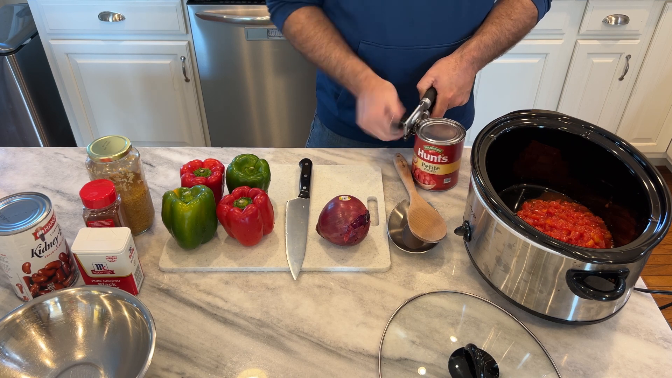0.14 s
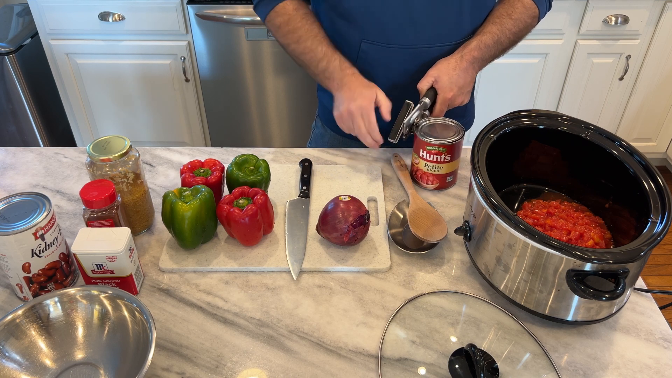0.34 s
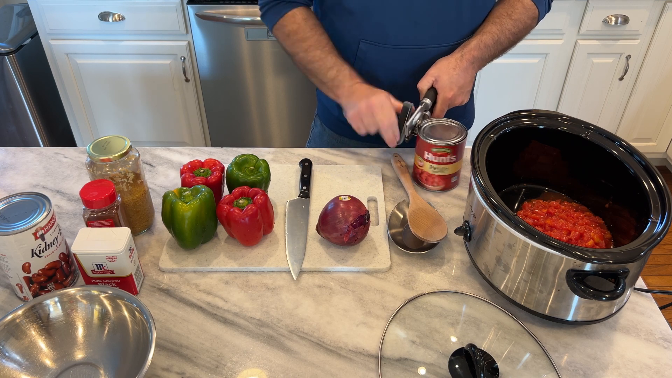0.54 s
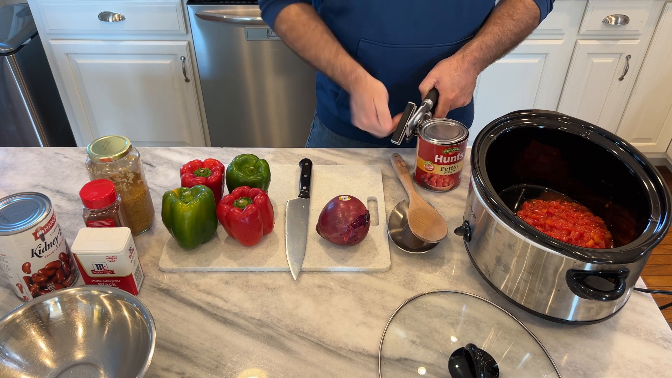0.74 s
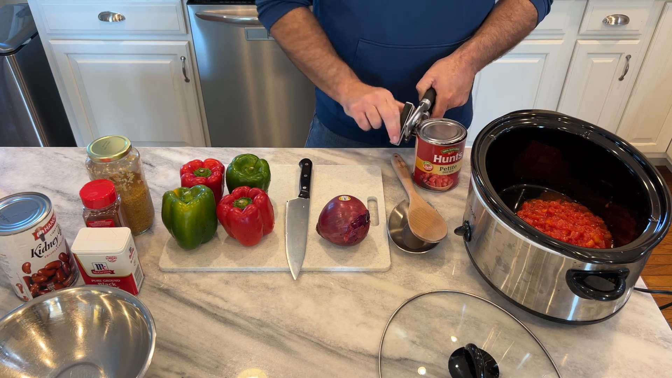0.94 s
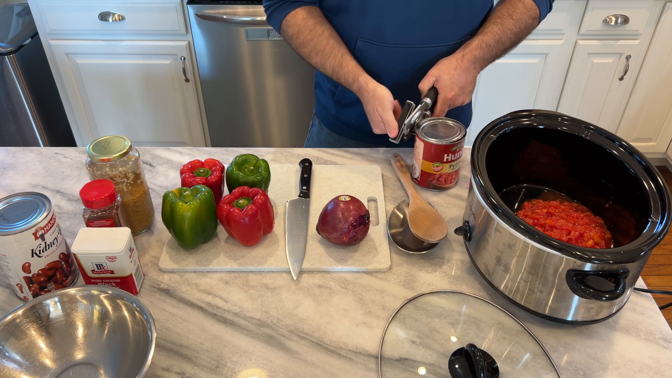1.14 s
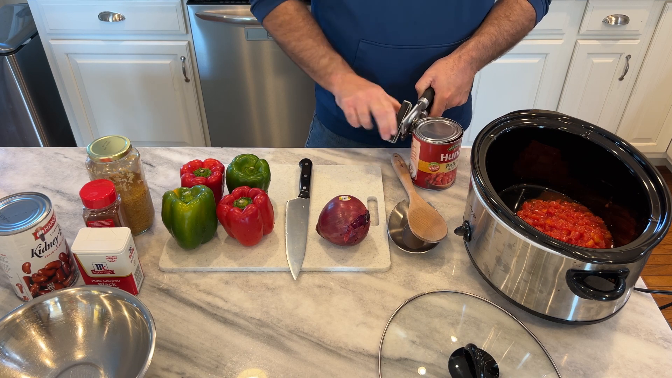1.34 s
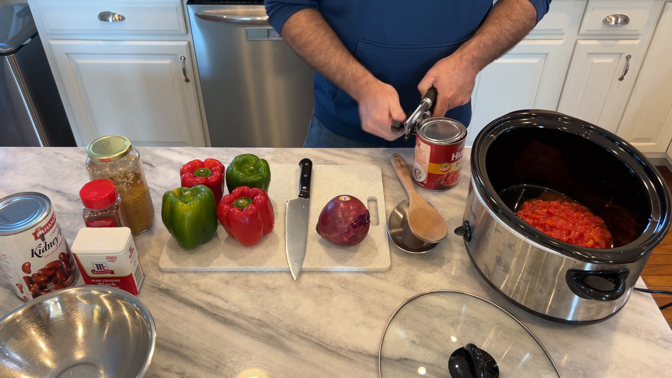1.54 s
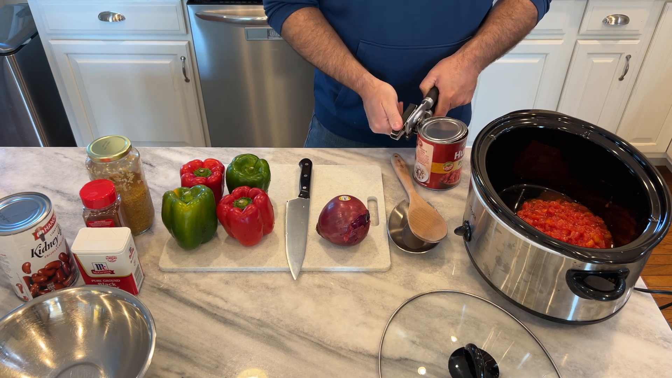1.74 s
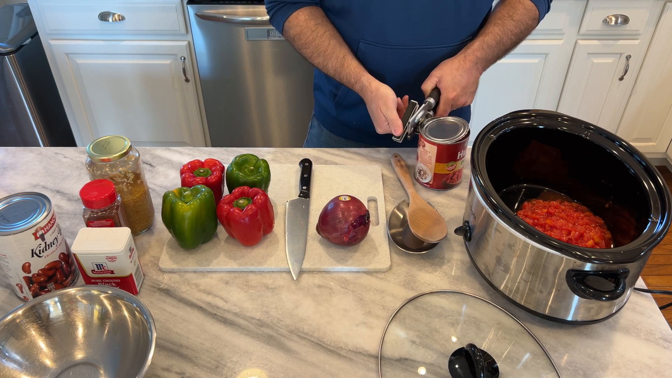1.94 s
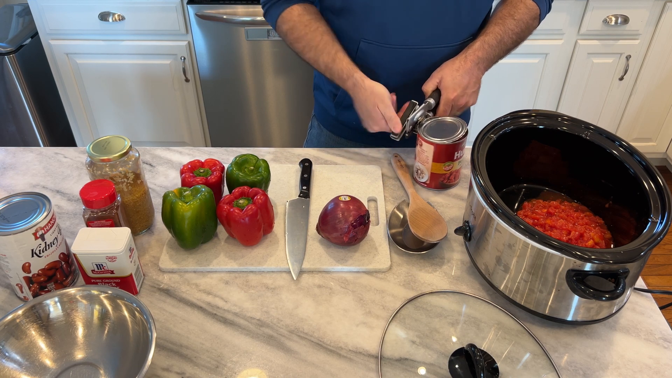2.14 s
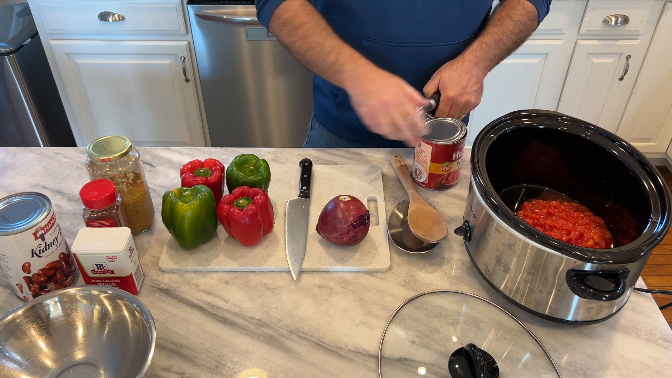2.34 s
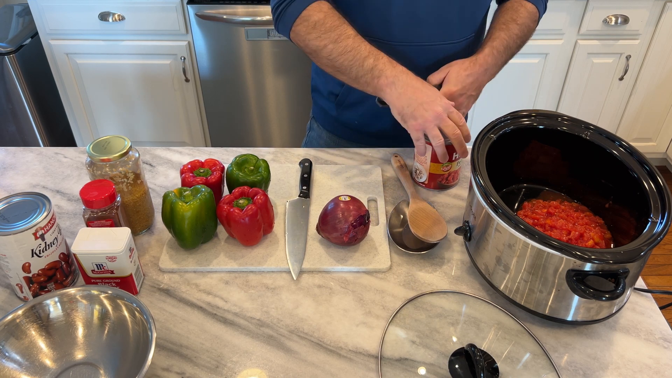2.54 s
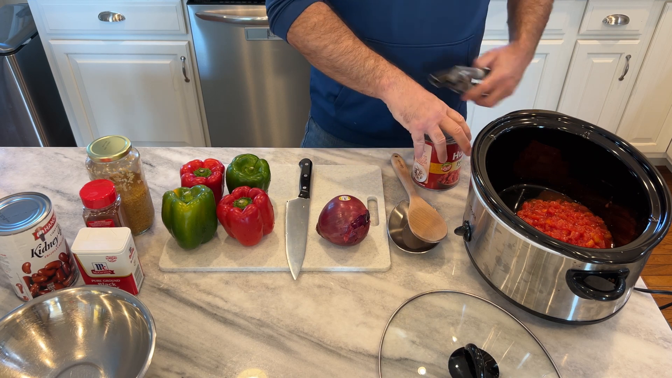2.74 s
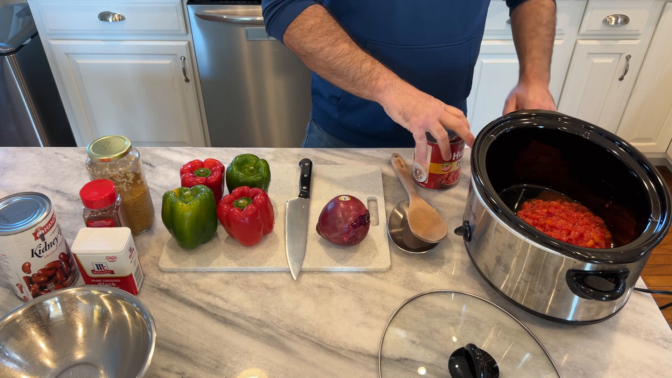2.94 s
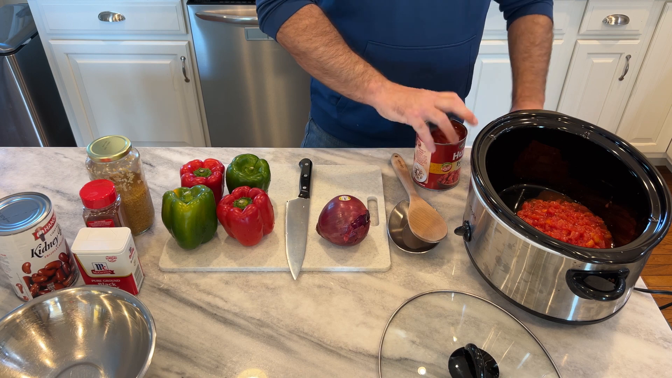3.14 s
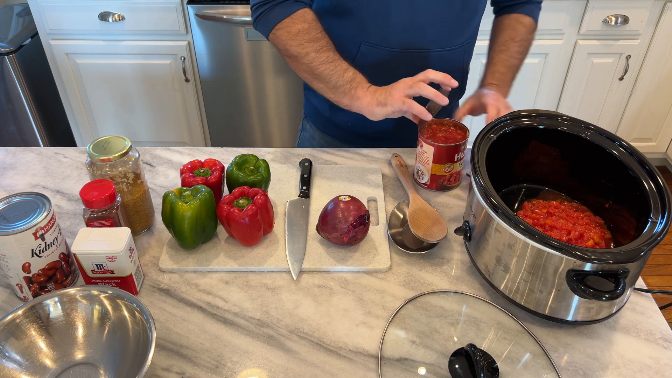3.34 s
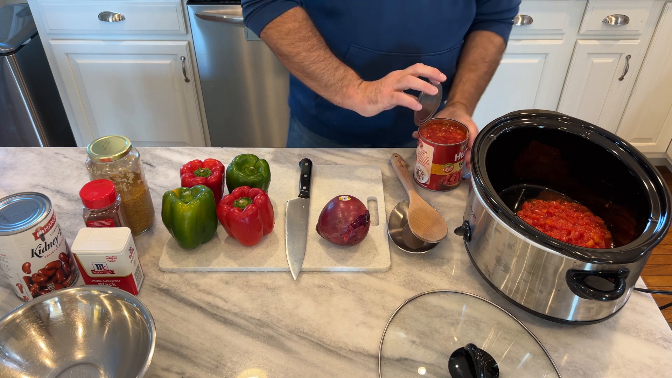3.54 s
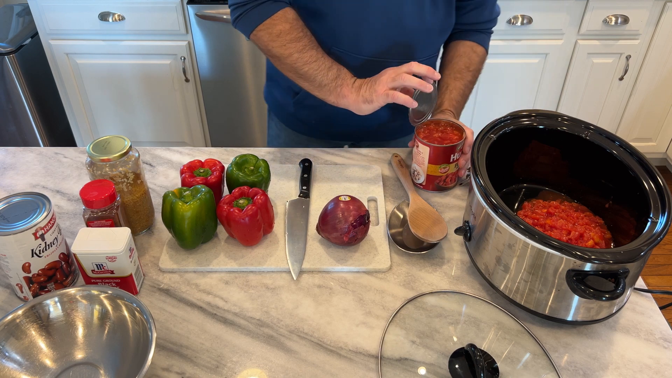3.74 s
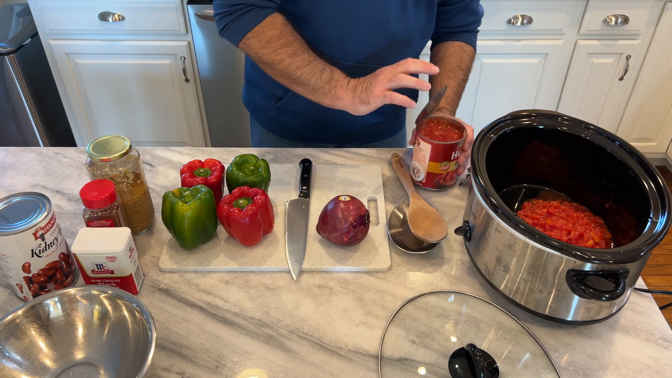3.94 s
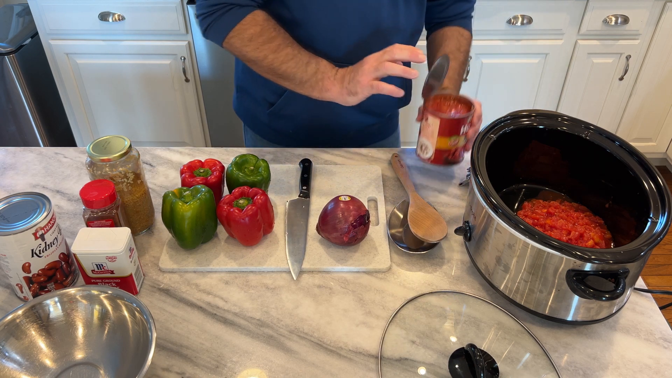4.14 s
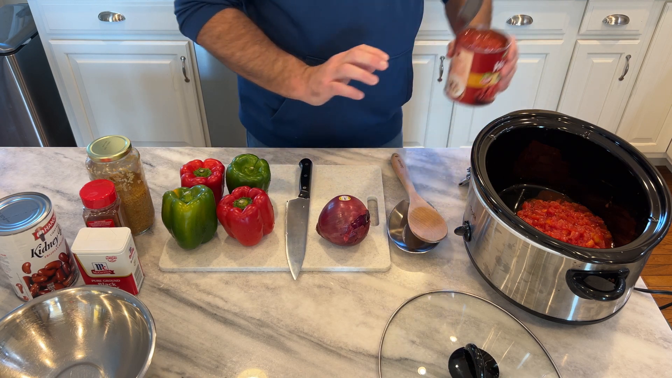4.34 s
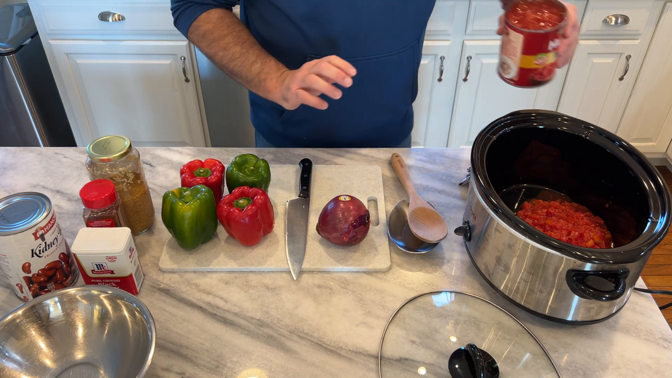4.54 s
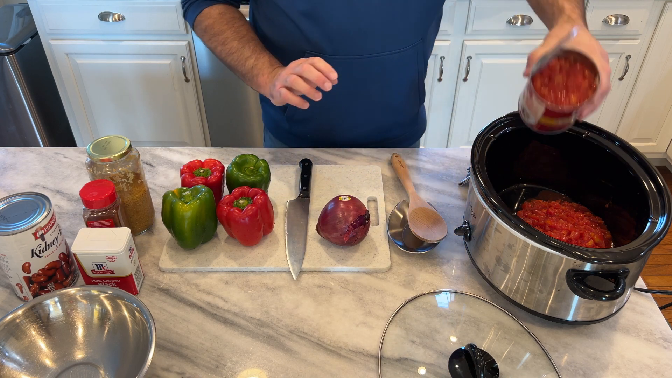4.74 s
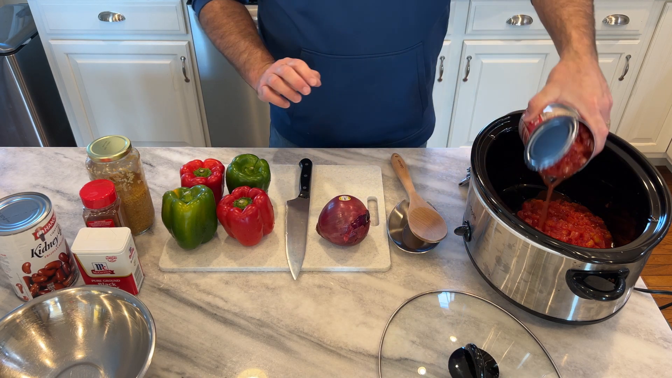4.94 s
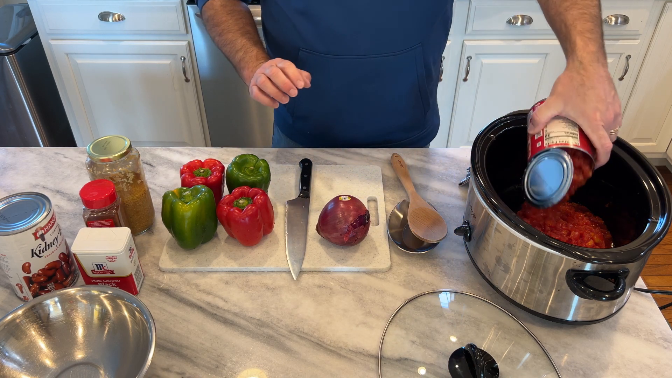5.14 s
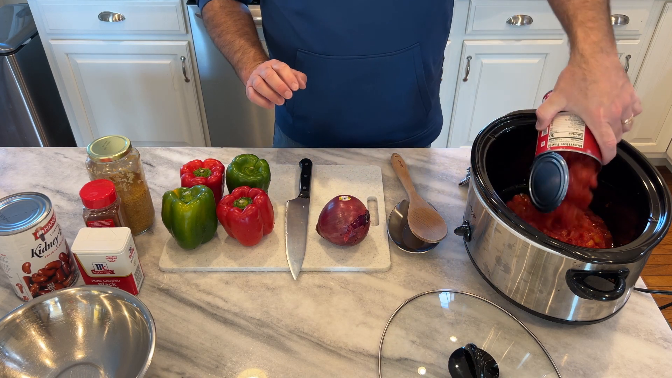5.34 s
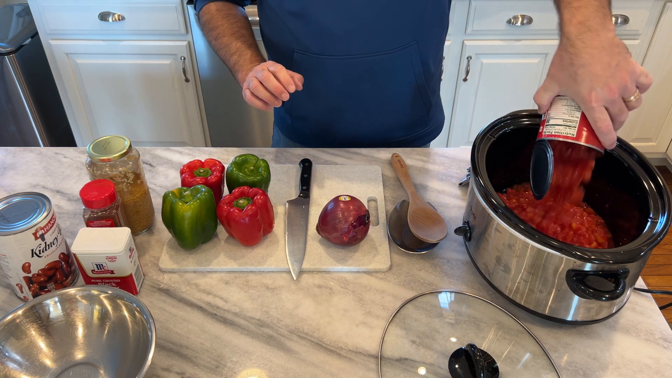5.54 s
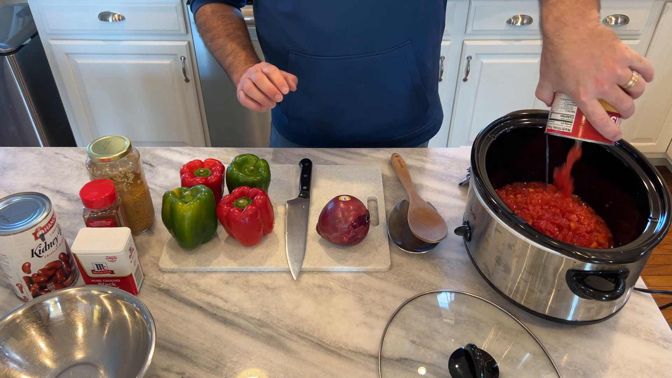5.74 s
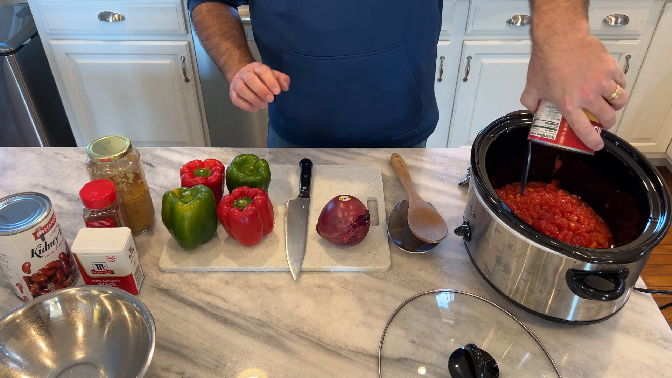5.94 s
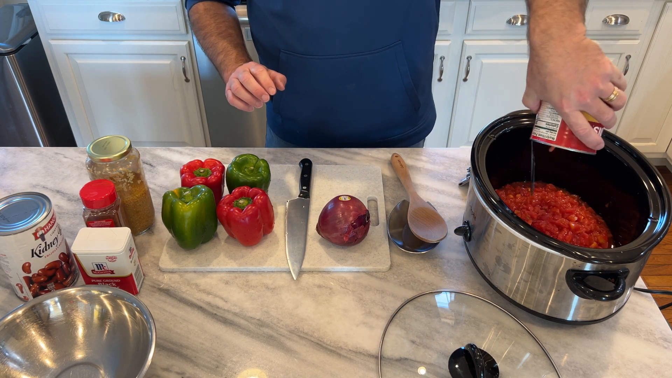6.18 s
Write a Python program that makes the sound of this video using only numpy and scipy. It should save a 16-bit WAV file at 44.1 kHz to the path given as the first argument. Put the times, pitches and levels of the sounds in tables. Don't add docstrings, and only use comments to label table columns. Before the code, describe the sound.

Stereo close recording of kitchen work: four grinding bursts of a can opener, roughly two per second and weakening, with hollow can resonance. A snap releases it, then the metal tool chinks and bangs onto a stone counter, the loudest moment. A hard knock rings the counter, low house rumble fills a pause, and chunky wet fruit slops softly into a slow cooker.

```python
import sys
import numpy as np
from scipy import signal
from scipy.fft import rfft, irfft, next_fast_len
from scipy.io import wavfile
from scipy.ndimage import uniform_filter1d

SR = 44100
rng = np.random.default_rng(int(sys.argv[2]) if len(sys.argv) > 2 else 0)


def wrap_up_sound(samples):
    columns = np.atleast_2d(samples).T
    tamed = np.clip(columns, -1, 1)
    steps = np.round(tamed * 32767).astype(np.int16)
    wavfile.write(sys.argv[1], SR, steps)


def volts_from_db(level):
    exponent = np.asarray(level, float) / 20
    return 10 ** exponent


N = 273861


def evened(x):
    return x / np.sqrt(np.mean(x ** 2) + 1e-20)


def read(points, hz):
    f, value = np.transpose(points)
    return np.interp(np.log(hz + 1), np.log(f + 1), value)


def curve(rows):
    s, *columns = np.transpose(rows)
    t = np.arange(N) / SR
    gate = np.clip(np.minimum(t - s[0], s[-1] - t) / 0.00158, 0, 1)
    return gate, *(np.interp(t, s, c) for c in columns)


def bumps(rows):
    t = np.arange(0, N + 64, 64) / SR
    total = sum(volts_from_db(db) * np.exp(np.minimum((t - s) / rise, (s - t) / fall)) for s, rise, fall, db in rows)
    return np.interp(np.arange(N) / SR, t, total)


def add(mix, s, sound):
    part = mix[round(s * SR):][:len(sound)]
    part += sound[:len(part)]


def coloured(x, points):
    if x.ndim > 1:
        return np.array([coloured(c, points) for c in x])
    gain_db = np.maximum(read(points, abs(np.fft.fftfreq(4096, 1 / SR))), -100)
    spectrum = np.exp(np.conj(signal.hilbert(np.log(volts_from_db(gain_db)))))
    taps = np.fft.ifft(spectrum).real[:2048]
    return signal.oaconvolve(x, taps, axes=-1)[..., :x.shape[-1]]


def resonate(x, modes):
    out = np.zeros(x.shape)
    for hz, width, db in modes:
        r = np.exp(-np.pi * width / SR)
        out += volts_from_db(db) * 2 * signal.lfilter([1 - r], [1, -r * np.exp(2j * np.pi * hz / SR)], x).real
    return out


def clicks(per_s, spread_db):
    size = volts_from_db(spread_db * np.minimum(rng.exponential(1, N), 5)) * rng.choice([-1., 1.], N)
    return evened(size * (rng.random(N) < per_s / SR))


def hits(rows, modes, ring_db, broad_db, bass_db, far_db=-2.5):
    t, out = np.arange(9000) / SR, np.zeros((2, N))
    for s, db, treble_db, top_db, ms in rows:
        rough, fine = rng.standard_normal((2, len(t)))
        colour = [(20, bass_db - 42.5), (90, bass_db - 4.5), (250, bass_db + 9.5), (1200, -1.5), (2300, -8),
                  (5500, treble_db - 3), (16000, treble_db - 15.5)]
        contact = np.exp(-1000 * t / max(ms, .3)) * (1 - np.exp(-t / 0.00036))
        crack = coloured(rough * contact, colour)
        crack /= abs(crack).max()
        push = coloured(1. * (t == 0), colour)
        ring = resonate(push, modes) * (1 - np.exp(-t / 0.0013))
        ring = volts_from_db(ring_db) * ring / abs(ring).max()
        tick = resonate(fine * np.exp(-t / 0.0019), [(13000, 2000, 0)])
        tick = volts_from_db(top_db + 8.0) * tick / abs(tick).max()
        add(out[0], s, volts_from_db(db) * (ring + tick + volts_from_db(broad_db) * crack))
        even = volts_from_db(broad_db) * evened(push) * crack.std()
        add(out[1], s, volts_from_db(db) * (volts_from_db(far_db) * ring + 0.41 * tick + even))
    return out


def ticks(rows, t60, rise):
    t, out = np.arange(6000) / SR, np.zeros(N)
    steepness = 3
    for s, db, hz, sharp_db in rows:
        fine, rough = rng.standard_normal((2, len(t)))
        sharp = np.diff(fine * np.exp(-t / 0.0018), n=steepness, prepend=np.zeros(steepness))
        tick = resonate(sharp, [(11900, 11000, 0)])
        fall = volts_from_db(-60 * t / max(t60, .003)) * (1 - np.exp(-t / 0.00038))
        fuzz = resonate(rough * fall ** 0.84, [(hz, 0.12 * hz, 0)])
        fuzz = resonate(fuzz, [(hz, 1.6 * hz, 0)])
        ring = np.sin(2 * np.pi * hz * t * (1 + rise * np.minimum(t / t60, 1))) * fall
        tick = volts_from_db(sharp_db + 12.5) * tick / abs(tick).max()
        add(out, s, volts_from_db(db) * (0.32 * ring + 0.95 * fuzz / abs(fuzz).max() + tick))
    return out


def crank():
    # start_s, push_s, hold_s, effort_db, brightness_db
    turns = [
        (-.1, 0.01, 0.085, -50, -4.5),
        (0.076, 0.02, 0.054, -30, -13.5),
        (0.529, 0.021, 0.06, -33, -12.5),
        (0.988, 0.031, 0.0038, -26.5, -8),
        (1.434, 0.031, 0.044, -39, -7),
    ]
    # pitch_hz, level_db per Hz
    scrape_colour = [(59, -38), (100, -8.5), (216, 7), (384, 5), (1030, 7), (2860, -13.5), (5500, -27),
                     (10500, -68.5), (15500, -22), (16500, -31)]
    # pitch_hz, width_hz, level_db
    lid_1 = [(218, 19, -4.5), (427, 50, -5), (642, 11.5, 11), (977, 31, 6), (1470, 28, -2), (1662, 36, -10),
             (2340, 81, -8), (3400, 35, -11), (3750, 46, -20)]
    lid_2 = [(221, 15.6, 2.5), (432, 29, -3), (645.5, 10.5, 3.5), (1016, 68, -4), (1433, 13, 2.5),
             (2360, 66, -9.5), (1770, 41, -17)]
    lid_3 = [(356, 120, -8.5), (642, 33, 3), (1064, 66, 7), (1610, 15, -15.5), (1760, 58, -4),
             (2350, 150, -1.5), (3435, 25, -4), (4430, 22, -24), (4800, 130, -13)]
    lid_4 = [(314.5, 12, 5), (820, 61, -7), (1062, 29, 7.5), (1185, 50, 8.5), (1320, 12, -1),
             (2536, 30, -2), (2700, 35, -8.5), (3120, 85, -15), (3400, 56, -18)]
    bite_db, ease_db_per_s, let_go_s = -16, 262.5, 0.14
    slips, out = clicks(per_s=1100, spread_db=3.6), np.zeros((2, N))
    for (s, push, hold, db, bright_db), modes in zip(turns, (lid_1, lid_1, lid_2, lid_3, lid_4)):
        top = s + push + hold
        gate, effort_db = curve([(s, db + bite_db), (s + push, db), (top, db),
                                 (top + let_go_s, db - ease_db_per_s * let_go_s)])
        part = slice(round(max(s, 0) * SR), round((top + 0.87) * SR))
        force = (gate * volts_from_db(effort_db))[part]
        ring = resonate(force * slips[part], modes) / np.std(resonate(slips[part], modes))
        scrape = evened(coloured(slips[part], scrape_colour)) * force * volts_from_db(1.16 * (bright_db + 8.0))
        out[:, part] += volts_from_db([[-6.0], [-10.5]]) * ring + volts_from_db(-10.5) * scrape
    return out


def teeth():
    # start_s, peak_db
    catches = [(0.0899, -29.5), (0.1125, -25.5), (0.133, -23.5), (0.1544, -27.5), (0.5553, -35),
               (0.578, -36), (0.9952, -36), (1.0256, -29), (1.0484, -24.5), (1.0653, -24), (1.4603, -38),
               (1.4924, -53), (1.5168, -38), (1.5446, -41.5)]
    # treble_db, top_db, contact_ms
    tooth = (-18, -15.5, 1.5)
    # pitch_hz, width_hz, level_db
    can = [(431, 40, 0), (736, 14, 3), (986, 87, 4.5), (1370, 290, -4), (1900, 58, -11.5), (2345, 90, -6),
           (3550, 46, -24), (4260, 41, -45)]
    return hits([row + tooth for row in catches], can, ring_db=-5.5, broad_db=-0.5, bass_db=-12)


def burrs():
    # start_s, peak_db, pitch_hz, sharp_tick_db
    jumps = [(0.1126, -33.5, 3560, -10), (0.1254, -34, 4750, -12), (0.1364, -42, 3000, -14),
             (0.1494, -38, 2350, -20), (0.1574, -36, 1690, -21), (0.5362, -48, 3600, -8),
             (0.5631, -33.5, 2400, -15), (0.5774, -44, 4860, -14), (0.5944, -47, 4400, -12),
             (0.6044, -40, 2620, -14), (0.6174, -42, 1600, -19), (0.6394, -51, 3400, -19),
             (1.0041, -41, 2900, -16), (1.0266, -30, 2360, -13), (1.049, -29.5, 3370, -6),
             (1.0644, -33, 2770, -16), (1.088, -38, 3400, -21), (1.4456, -55, 3470, -8),
             (1.4661, -49, 3180, -14), (1.4935, -47, 3260, -14), (1.5184, -44.5, 3260, -12),
             (1.5464, -47, 2880, -10), (3.638, -27, 2400, -25), (3.6595, -27, 2570, -21),
             (3.66, -26, 1470, -28)]
    return volts_from_db([[2.5], [-9.0]]) * ticks(jumps, t60=.012, rise=.002)


def lid():
    # start_s, pitch_hz, swell_s, t60_s,
    # level_db
    sings = [(.145, 978, 0.013, 0.27, -32), (.19, 1480, .02, 0.24, -35), (.228, 2370, .002, .13, -32),
             (.232, 880, .004, 0.14, -39), (.55, 2200, .004, .12, -39), (.24, 965, .006, 0.26, -33),
             (.23, 1850, .002, 0.087, -39), (0.14, 2600, .008, 0.071, -35), (.61, 1300, .015, 0.24, -36),
             (1.0, 1296, .008, 0.14, -33), (1.03, 1000, .01, 0.41, -34), (1.2, 1060, 0.014, 0.2, -40),
             (1.35, 1170, 0.0085, 0.22, -52), (1.46, 1320, .02, 1.2, -51), (1.46, 1300, .01, .5, -48),
             (1.6, 750, .003, 0.06, -42.5), (1.882, 1400, .003, 0.22, -50), (1.886, 409, .004, .1, -50),
             (2.128, 1006, 0.0028, .07, -26), (2.185, 1000, .008, .07, -38), (2.13, 1260, .003, .14, -30),
             (2.135, 762, .006, 0.1, -39), (3.043, 1359, .002, 0.13, -26.5),
             (3.157, 1000, 0.0021, 0.11, -28), (3.24, 720, 0.0023, .09, -26.5),
             (3.239, 1260, .002, .09, -26.5)]
    t, out = np.arange(22000) / SR, np.zeros(N)
    for s, hz, swell, t60, db in sings:
        a, b = rng.random(2)
        pair = np.sin(2 * np.pi * (hz * t + a)) + .5 * np.sin(2 * np.pi * (1.035 * hz * t + b))
        wobble = uniform_filter1d(rng.standard_normal(len(t)), size=400)
        shaken = 1 + .55 * evened(uniform_filter1d(wobble, size=300))
        swelling = 1 - np.exp(-t / max(swell, .001))
        ending = np.minimum((t[-1] - t) / .1, 1)
        add(out, s, volts_from_db(db - 60 * t / t60) * swelling * ending * shaken * pair)
    return volts_from_db([[.5], [-13.0]]) * out


def handle():
    # start_s, peak_db, treble_db, top_db, contact_ms
    knocks = [(0.035, -31.5, -26.5, -30, 4.7), (0.229, -18.5, -23, -18, 3.5), (0.489, -36, -25, -18, 10),
              (0.915, -33.5, -38, -25, 4.4), (0.944, -39.5, -18.5, -21, 17), (1.151, -24, -20, -18, 2.8),
              (1.397, -31.5, -31, -34, 2.8)]
    # pitch_hz, width_hz, level_db
    grip = [(410, 29, -2), (685, 27, -2.5), (958, 80, 3.5), (1490, 53, -5.5), (1820, 80, -10),
            (2400, 100, -4.5), (3730, 60, -14)]
    return hits(knocks, grip, ring_db=-3.5, broad_db=-6.0, bass_db=-14.5, far_db=-4.5)


def snaps():
    # start_s, peak_db, treble_db, top_db, contact_ms
    releases = [(1.88, -33.5, -26.5, -31, 1.2), (1.89, -37, -39.5, -40, 2), (2.1275, -20, -17, -19.5, 1.67),
                (2.138, -23.5, -30.5, -35, 2), (2.165, -29, -30, -35, 3)]
    # pitch_hz, width_hz, level_db
    freed = [(121, 29, -1.5), (406, 58, -8.5), (747, 90, -3), (800, 76, -9), (1021, 78, 1), (1240, 125, -2),
             (2300, 58, -18), (4780, 150, -23)]
    return hits(releases, freed, ring_db=-3.5, broad_db=-6.0, bass_db=-10.0, far_db=-8.5)


def touches():
    # start_s, peak_db, pitch_hz, sharp_tick_db
    taps_on_can = [(.906, -59, 3500, -3), (1.151, -40.5, 2200, -20), (1.4642, -61, 7040, -4),
                   (1.4921, -56, 13600, -2), (1.6483, -67, 6800, 0), (1.7764, -58.5, 2900, -20),
                   (1.7968, -60.5, 2980, -13), (2.104, -71, 3100, -20), (2.376, -54, 2810, -17),
                   (2.3894, -56, 3020, -6), (2.5556, -64, 5850, -38), (2.556, -57, 2040, -30),
                   (2.5558, -66, 4000, -30), (2.7317, -58, 6950, -17), (2.809, -58, 2200, -2),
                   (3.4696, -56.5, 5830, -5)]
    return volts_from_db([[1.5], [-4.0]]) * ticks(taps_on_can, t60=0.017, rise=.002)


def palm():
    # loudest_s, swell_s, fade_s, level_db
    rub = [(2.62, .03, .03, -85), (2.77, .05, .04, -77.5), (1.79, .015, 0.018, -83)]
    rustle = resonate(clicks(per_s=1500, spread_db=3.5), [(2150, 600, 0)])
    return bumps(rub) * evened(resonate(rustle, [(2200, 1100, 0)]))


def touch_down():
    # start_s, peak_db, treble_db, top_db, contact_ms
    chinks = [(2.82, -33, -7, -33, 25), (2.9572, -43.5, -20.5, -25, 3.1)]
    # pitch_hz, width_hz, level_db
    jaws = [(1500, 180, -5.5), (3080, 260, 1), (3680, 400, -5.5), (4500, 600, -5), (5900, 400, -5)]
    # start_s, peak_db, treble_db, top_db, contact_ms
    clinks = [(2.9695, -36, -16, -31, 5.4), (2.981, -34, -13, -18, 5), (2.9865, -33, -11.5, -15, 4.4),
              (2.993, -36.5, -14, -17, 5)]
    # pitch_hz, width_hz, level_db
    wheels = [(700, 120, -10), (1360, 150, -10.5), (2100, 100, -16), (2700, 45, 3), (2790, 70, -6.5),
              (6760, 120, -4), (8600, 200, -3.5), (10900, 150, -6.5)]
    jaw_sound = hits(chinks, jaws, ring_db=0.0, broad_db=-8.5, bass_db=-36.5, far_db=-3.5)
    return jaw_sound + hits(clinks, wheels, ring_db=-2.0, broad_db=-4.0, bass_db=-17.5)


def laid_down():
    # start_s, peak_db, treble_db, top_db, contact_ms
    bounces = [(3.043, -14, -10.5, -39.5, 12), (3.156, -14.5, -8.5, -17.5, 20)]
    # pitch_hz, width_hz, level_db
    opener = [(115, 32, 7), (740, 130, -5.5), (1000, 53, 0), (1326, 110, 1), (2340, 150, -6),
              (3400, 210, -3), (4280, 72, -6), (5260, 80, -6), (6060, 120, -4), (6700, 200, -5)]
    # start_s, peak_db, treble_db, top_db, contact_ms
    landing = [(3.238, -10, -9, -19.5, 4.4), (3.25, -16.5, -3, -25, 8)]
    # pitch_hz, width_hz, level_db
    flat = [(115, 32, 6.5), (662, 60, 1.5), (1000, 80, -3.5), (1260, 130, -1), (2320, 150, -6.5),
            (3400, 100, -6.5), (4240, 200, -10), (5600, 70, -5), (5990, 140, 1), (6650, 120, 1),
            (7070, 160, -3.5)]
    bouncing = hits(bounces, opener, ring_db=-4.0, broad_db=-6.5, bass_db=-19.0, far_db=-8.0)
    return bouncing + hits(landing, flat, ring_db=-5.0, broad_db=-6.0, bass_db=-18.5, far_db=-9.5)


def counter_knock():
    # start_s, peak_db, treble_db, top_db, contact_ms
    knock = [(3.628, -25, -19.5, -23, 2.9), (3.636, -17.5, -11.5, -16.5, 5.6),
             (3.6592, -11.5, -8.5, -4, 3.5), (3.669, -16, -3.5, -25, 5.6)]
    # pitch_hz, width_hz, level_db
    counter = [(113.9, 70, 6), (318, 45, 2.5), (689, 90, 5), (971, 34, -2.5), (1458, 40, -6.5),
               (2310, 860, -8), (2940, 30, -7.5), (4260, 30, -1)]
    return hits(knock, counter, ring_db=-5.0, broad_db=-4.0, bass_db=-14.5, far_db=-7.5)


def pour():
    # start_s, level_db
    sliding = [(5.07, -86), (5.12, -62), (5.17, -67), (5.26, -61.5), (5.35, -67.5), (5.426, -60),
               (5.56, -68), (5.628, -56), (5.694, -68), (5.856, -96.5), (6.034, -106), (6.08, -85.5)]
    # pitch_hz, level_db per Hz
    wet_colour = [(300, -27), (550, 0), (1000, -19), (2000, -4), (4500, 9), (7000, 5), (12000, 0),
                  (16000, -14)]
    # loudest_s, swell_s, fade_s, level_db
    landings = [(5.385, 0.015, 0.027, -55), (5.455, 0.011, .025, -59.5)]
    gate, db = curve(sliding)
    bubbles = np.zeros(N)
    for hz in np.geomspace(550, 7000, 16):
        u = np.arange(round(14 * SR / hz)) * hz / SR
        chirp = np.sin(2 * np.pi * u * (1 + 0.012 * u)) * u * np.exp(-u / 2.0)
        bubbles += signal.oaconvolve(clicks(per_s=34, spread_db=4.5), chirp)[:N]
    smacks = coloured(clicks(per_s=900, spread_db=3.4), wet_colour)
    slop = resonate(clicks(per_s=540, spread_db=6.5), [(520, 360, 0)])
    slop = evened(resonate(slop, [(527, 490, 0)]))
    flow = volts_from_db(2.0) * evened(smacks) + volts_from_db(-6.0) * evened(bubbles)
    return gate * volts_from_db(db) * flow + bumps(landings) * slop


def drips():
    # start_s, peak_db, pitch_hz, sharp_tick_db
    drops = [(4.9698, -50.5, 5640, -11), (5.062, -49.5, 13000, -2), (5.0825, -51, 6700, -11),
             (5.1, -54.5, 1880, -25.5), (5.113, -50.5, 1500, -2), (5.121, -56, 1154, -10),
             (5.19, -52, 2750, -15), (5.501, -48, 2000, -10), (5.553, -52, 2900, -15),
             (5.1344, -59, 2180, 5), (5.1831, -49, 2700, 4), (5.2313, -63, 3300, -5),
             (5.2405, -41, 4530, -17), (5.241, -43.5, 2300, -2), (5.246, -49.5, 1260, -15),
             (5.2631, -37, 9000, -19), (5.2924, -53, 4300, 6), (5.3176, -43.5, 1900, -23),
             (5.3899, -45.5, 2740, -9), (5.4004, -48, 2870, -2), (5.4205, -38.5, 1770, -11),
             (5.4434, -40, 1990, -7), (5.4931, -38, 2360, -4), (5.5544, -51, 1830, -12),
             (5.6274, -42, 2065, -4), (5.7401, -46, 3450, -17), (5.759, -44, 5400, -5),
             (5.4995, -46.5, 4500, -4), (5.533, -53, 6960, -1), (5.571, -64, 7000, -4),
             (5.631, -49, 5000, 0), (5.645, -49, 4500, -3), (5.794, -46, 6100, -10), (5.868, -66, 13000, 0),
             (5.248, -46, 4500, -8), (5.255, -42.5, 6640, -4), (5.077, -59, 3300, -20),
             (5.15, -57, 3496, -20), (5.7683, -39, 3276, -5), (5.772, -45, 3900, -14),
             (5.9732, -53.5, 5420, 7.5), (5.987, -55, 5570, -12), (6.0171, -60, 6330, 4)]
    # start_s, peak_db, pitch_hz, sharp_tick_db
    splats = [(5.5903, -36.5, 1240, -9), (5.62, -45, 1330, -30), (5.592, -36, 2600, -8),
              (5.594, -40.5, 2100, -23), (4.9282, -48, 5800, -19)]
    return ticks(drops, t60=0.03, rise=0.081) + ticks(splats, t60=0.053, rise=0.023)


def sleeve():
    # loudest_s, swell_s, fade_s, level_db
    rustles = [(2.374, .01, .1, -81), (2.73, .02, .03, -91), (3.55, 0.036, 0.077, -71),
               (3.89, 0.0054, 0.0093, -63.5), (4.3, .15, .2, -93.5), (4.75, 0.079, 0.34, -88.5)]
    cloth = resonate(clicks(per_s=9000, spread_db=-2.0), [(13400, 3000, 0)])
    return bumps(rustles) * evened(resonate(cloth, [(13400, 3100, 0)]))


def counter_top(x, echo_db):
    left, right = np.roll(x, 97), -np.roll(x, 61)
    return x + volts_from_db(echo_db) * np.array([left, right])


def kitchen(x):
    # pitch_hz, t60_s
    tail_times = [(150, 0.87), (400, 0.51), (1000, 0.69), (2800, 0.57), (6000, 0.59), (9000, 0.49),
                  (12000, 0.3), (15000, 0.3)]
    # pitch_hz, level_db
    thrown_back = [(100, -4.5), (300, 1), (1000, -4), (6000, 1.5), (9000, -4), (13000, -4.5)]
    hz, t, z = signal.stft(rng.standard_normal((2, 2, 36000)), SR, nperseg=256)
    fall = volts_from_db(-60 * t / read(tail_times, hz)[:, None]) + volts_from_db(3.0 - 60 * t / 0.14)
    fall *= np.exp(-(t / 0.53) ** 4)
    tails = signal.istft(z * fall * volts_from_db(read(thrown_back, hz))[:, None], SR, nperseg=256)[1]
    tails *= np.clip((np.arange(tails.shape[-1]) / SR - .0015) / 0.0039, 0, 1)
    tails = tails / np.linalg.norm(tails[0, 0])
    drift = 2 * np.pi * 7.3 * np.arange(N) / SR
    paths = np.array([np.sin(drift), np.cos(drift)])[:, None]
    return (paths * signal.oaconvolve(x[None, None], tails, axes=2)[..., :N]).sum(0)


def house():
    # strongest_s, level_db
    shakes = [(.055, -45.5), (.18, -37), (.64, -46.5), (.92, -51.5), (1.05, -39), (1.14, -59),
              (1.25, -55.5), (1.42, -54.5), (1.52, -44), (1.9, -57.5), (2.142, -44), (3.06, -59.5),
              (3.18, -45), (3.26, -45), (3.66, -55.5), (3.98, -61.5), (4.22, -57), (4.95, -61.5),
              (5.35, -56.5), (5.65, -57.5)]
    # pitch_hz, width_hz, level_db
    shake_modes = [(80.6, 13, 2), (108, 15, -0.5)]
    # pitch_hz, width_hz, level_db
    floor_modes = [(58, 14, 1.5), (78, 12, -5.5), (115, 9.4, -1)]
    # start_s, level_db
    drone_levels = [(0.0, -62), (1.5, -65.5), (3.3, -65.5), (3.7, -53), (4.19, -54.5), (4.76, -53),
                    (5.03, -65.5), (6.0, -68), (6.21, -59)]
    # pitch_hz, width_hz, level_db
    drone_modes = [(205, 36, 6), (523, 140, -6), (954, 13, -6.5)]
    # pitch_hz, level_db per Hz
    hush_colour = [(15, -45.5), (40, -16.5), (120, 0), (350, -0.5), (540, -16), (1100, -15.5),
                   (2400, -27.5), (8000, -34.5), (11000, -36), (13500, -33.5), (15500, -39), (16800, -54)]
    a, b, c, d = rng.standard_normal((4, 2, N))
    jolts = bumps([(s, 0.034, 0.098, db) for s, db in shakes])
    shake = jolts * evened(resonate(resonate(a, shake_modes), [(96, 69, 0)]))
    rest = volts_from_db(-62.5) * evened(resonate(resonate(d, floor_modes), [(83, 150, 0)]))
    drone = evened(resonate(resonate(b, drone_modes), [(383.5, 210, 0)]))
    drone = volts_from_db(curve(drone_levels)[1]) * drone
    return shake + rest + drone + volts_from_db(-66.5) * evened(coloured(c, hush_colour))


def scene():
    near = crank() + teeth() + burrs() + lid() + handle() + snaps() + touches() + palm()
    near = near + touch_down() + laid_down() + counter_knock()
    wet = pour() + drips()
    direct = counter_top(volts_from_db(-2.23) * near[0] + volts_from_db(-1.0) * wet, echo_db=-8.5)
    shielded = volts_from_db(-5.5) * uniform_filter1d(wet, size=3)
    return direct + volts_from_db(3.5) * kitchen(near[1] + shielded) + sleeve() + house()


def low_pass(x):
    return signal.sosfilt(signal.butter(12, 16830, fs=SR, output="sos"), x)


def record(dry):
    # pitch_hz, share
    shared = [(60, 1), (150, 0.92), (300, 0.59), (700, 0.099), (5500, 0.069), (8000, 0.13), (9200, 0.98),
              (16000, 0.995)]
    # pitch_hz, lag_radians
    lag = [(7000, 0.91), (8600, 0.79), (9400, 2.7), (10800, 3.93), (12300, 5.4), (14500, 5.2), (15500, 8.5),
           (16500, 10.5)]
    # pitch_hz, level_db
    left_db = [(60, -3), (110, 0.5), (200, -2.5), (380, 1), (700, -1.5), (1290, 0.5), (2380, 0),
               (4400, 5.5), (8120, 3), (15000, -2)]
    size = next_fast_len(N, True)
    hz = np.fft.rfftfreq(size, 1 / SR)
    left, right = rfft(dry, size, axis=1)
    alike = np.clip(read(shared, hz), 0, 1)
    lead = np.exp(1j * read([(5500, 0)] + lag, hz))
    right = alike * lead * left + np.sqrt(1 - alike ** 2) * right
    edges = volts_from_db(read([(25, -3), (55, 0), (15800, -1), (16650, -12), (16900, -75.5)], hz))
    tilt = volts_from_db(read(left_db, hz) / 2)
    ports = np.array([left * edges * tilt, right * edges / tilt])
    return low_pass(irfft(ports, size, axis=1)[:, :N])


dry = scene()
out = record(dry)
wrap_up_sound(out)
```